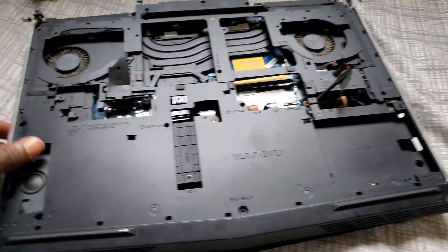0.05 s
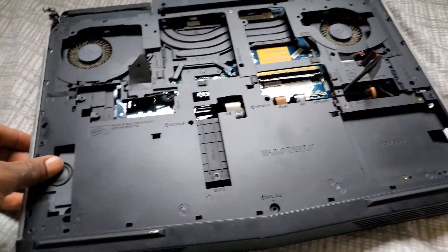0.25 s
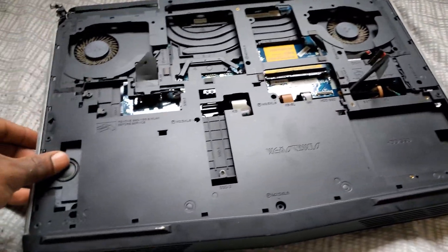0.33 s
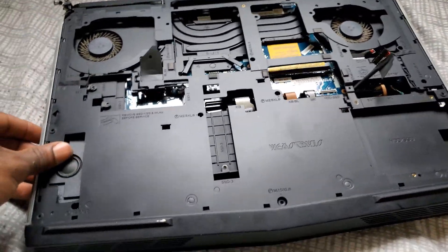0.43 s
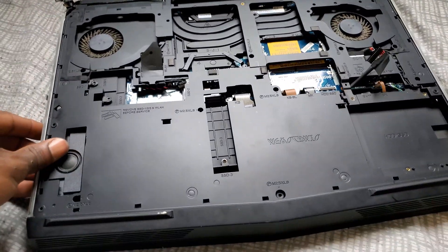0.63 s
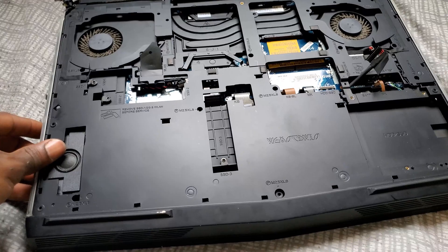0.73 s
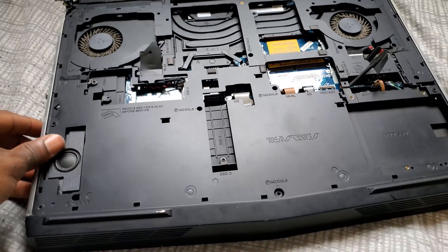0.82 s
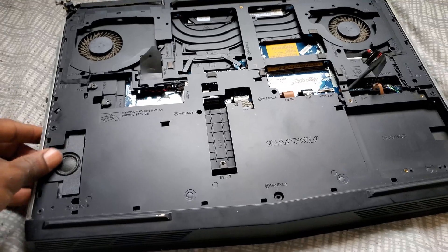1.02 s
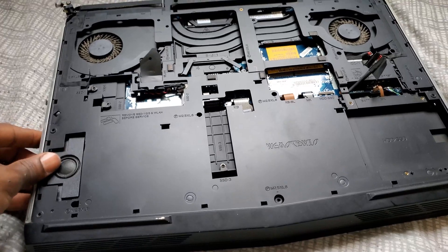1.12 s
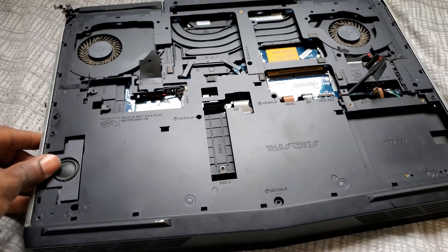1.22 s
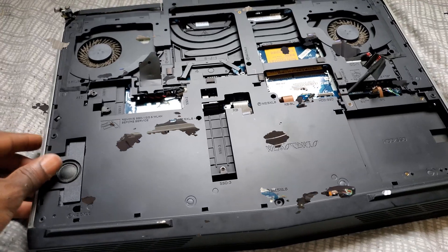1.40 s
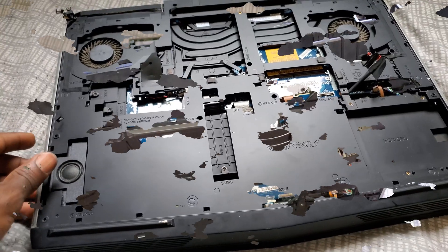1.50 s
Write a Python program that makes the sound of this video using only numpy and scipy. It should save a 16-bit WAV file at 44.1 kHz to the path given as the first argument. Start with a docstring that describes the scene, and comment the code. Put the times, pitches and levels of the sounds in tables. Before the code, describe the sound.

An opened laptop is set down on a bed: its plastic case clacks twice with soft thumps and cloth scuffs, loose parts rattle briefly, then two soft knocks follow. Heard close in a small, quiet room.

```python
"""Laptop set down on a bed

A small quiet room, a stereo microphone close by. An opened laptop is shifted by hand and let down on
the cloth cover. Its plastic case clacks twice, loose parts rattle as it settles, and two soft knocks
follow. The weight thumps into the padding, the case scuffs the cloth, and a low rumble lies under it."""
import sys
import numpy as np
from scipy import signal
from scipy.io import wavfile

SR = 44100
rng = np.random.default_rng(int(sys.argv[2]) if len(sys.argv) > 2 else 0)


def unload_wav(signal):
    """Save mono or channel-first audio to the path in sys.argv[1] as 16-bit WAV at rate SR, clipped to [-1, 1]."""
    wavfile.write(
        sys.argv[1],
        SR,
        np.round(np.clip(np.atleast_2d(signal).T, -1, 1) * 32767).astype(np.int16),
    )


N = 68355
TIME = np.arange(N) / SR
EDGES_HZ = np.minimum(20.3 * 2 ** (np.arange(21) / 2), 17000)  # half octaves
BANDS = [(lo, hi, np.sqrt(lo * hi)) for lo, hi in zip(EDGES_HZ, EDGES_HZ[1:])]


def from_db(db):
    """Decibels to gain."""
    return 10 ** (np.asarray(db) / 20)


def at_hz(points, hz, column=1):
    """Read a column of a table on a log-frequency axis."""
    table = np.array(points)
    return np.interp(np.log(hz), np.log(table[:, 0]), table[:, column])


def pan(db):
    """Left and right gains; positive dB leans left."""
    return from_db(np.array([[.5], [-.5]]) * db)


def stereo_noise(correlation):
    """White noise in two channels with a given correlation."""
    c = np.clip(correlation, -1, 1)
    mid, side = rng.standard_normal((2, N))
    return np.sqrt((1 + c) / 2) * mid + np.sqrt((1 - c) / 2) * side * [[1], [-1]]


def band(x, lo, hi):
    """Band-pass that keeps the level of white noise."""
    sos = signal.butter(2, [lo, hi], "band", fs=SR, output="sos")
    return signal.sosfilt(sos, x + 1e-18) * np.sqrt(SR / 2 / (hi - lo))


def fade(power, t60):
    """Each pulse of power dies away."""
    return signal.lfilter([1], [1, -from_db(-120 / (t60 * SR))], power + 1e-18)


def smooth(x, seconds):
    """One-pole lag."""
    r = np.exp(-1 / (seconds * SR))
    return signal.lfilter([1 - r], [1, -r], x)


# Room tone at the microphone: (frequency [Hz], band level [dB])
ROOM_TONE = [(25, -66), (40, -67), (60, -48.5), (90, -63), (130, -67), (200, -62), (300, -70), (550, -77),
             (1100, -75.5), (2200, -73), (6000, -69.5), (9000, -71.5), (14000, -69.5)]
# Its lean: (frequency [Hz], left-right [dB])
ROOM_TONE_PAN = [(100, 0.5), (1000, 1), (2500, -7.5), (6000, -0.5), (12000, -0.5)]
# Its width: (frequency [Hz], left-right correlation [0-1])
ROOM_TONE_CORRELATION = [(60, 0.74), (200, 0.87), (550, 0.036)]


def room_tone():
    """Low rumble and faint hiss all around the bed."""
    out = 0
    for lo, hi, hz in BANDS:
        noise = band(stereo_noise(at_hz(ROOM_TONE_CORRELATION, hz)), lo, hi)
        out += from_db(at_hz(ROOM_TONE, hz)) * pan(at_hz(ROOM_TONE_PAN, hz)) * noise
    return out


# The walls' answer: (frequency [Hz], level against the contact [dB], t60 [s], left-right [dB])
REVERB = [(176, -4.5, 0.22, -2), (426, -12, 0.12, 1), (810, -9, 0.13, -4), (1230, -3.5, 0.16, 1.5),
          (2660, -12.5, 0.2, -9), (5170, -6.5, 0.23, -6), (12000, -11, 0.21, 0)]


def room_tail(hits, hz):
    """Power of the diffuse tail in one band: it builds quickly in the small room, then dies."""
    db, t60, pan_db = (at_hz(REVERB, hz, column) for column in (1, 2, 3))
    return smooth(fade(hits ** 2, t60), seconds=0.0032) * (from_db(db) * pan(pan_db)) ** 2


# Resonances of the plastic case: (frequency [Hz], lift [dB], t60 [s], left-right [dB])
CASE_RESONANCES = [(217.7, 0.5, 0.26, 1), (368, 2, 0.052, -4), (638.7, 0, 0.075, 5.5),
                   (705.5, -7, 0.08, 4.5), (884.4, 3.5, 0.11, -0.5), (1152, 3, 0.031, 7),
                   (1236, 6, 0.073, 3.5), (1490, -9, 0.069, 9.5), (1677, -0.5, 0.067, 10),
                   (1877, -13, 0.045, 13.5), (2190, -0.5, .085, 2.5), (2285, -5.5, 0.058, 1.5),
                   (2425, -18, .08, -3), (2785, 0, 0.056, -4), (3350, -12, 0.078, -12),
                   (3523, -13.5, 0.055, -4), (3936, 0, 0.077, -3), (4440, -6.5, .2, 4.5)]


def case(shake):
    """The case's resonances ring on top of whatever shakes it."""
    out = shake
    for hz, lift_db, t60, pan_db in CASE_RESONANCES:
        r, w = from_db(-60 / (t60 * SR)), 2 * np.pi * hz / SR
        ring = signal.lfilter([1, 0, -1], [1, -2 * r * np.cos(w), r * r], shake) * (1 - r * r) / 2
        out = out + from_db(lift_db) * pan(pan_db) * ring
    return out


# Width of the case at the microphone: (frequency [Hz], left-right correlation [0-1])
CASE_CORRELATION = [(250, 1), (700, 0.87), (1250, 0)]


def case_noise(hz):
    """White noise as wide as the case sounds at hz: centred bass, spread treble."""
    return stereo_noise(at_hz(CASE_CORRELATION, hz))


# Slides on the cover: (peak time [s], level [dB], rise [s], fall [s], tilt about 3 kHz [dB/octave])
SLIDES = [(.003, -32.5, 0.014, 0.035, -2.5), (0.179, -46.5, 0.051, 0.035, -1),
          (0.46, -37, 0.018, 0.034, -2.5), (1.098, -54.5, 0.027, 0.053, 2),
          (1.453, -57, 0.006, 0.021, -1.5), (1.54, -61, 0.055, .06, 5)]
# Colour of the cloth friction: (frequency [Hz], band gain [dB])
CLOTH_COLOUR = [(200, -24.5), (500, -37), (1000, -24), (2000, -9), (3500, -12.5), (6500, -6.5),
                (9000, -16.5), (14000, -9)]


def scuffs():
    """Soft hiss of the case on cloth swells with each slide and rings in the case, a little to the right."""
    out = 0
    for lo, hi, hz in BANDS[6:]:
        slides = 0
        for peak, db, rise, fall, tilt_db in SLIDES:
            swell = np.exp(-np.maximum((peak - TIME) / rise, (TIME - peak) / fall))
            slides += from_db(db + tilt_db * np.log2(hz / 3000)) * swell
        out += from_db(at_hz(CLOTH_COLOUR, hz)) * band(slides * case_noise(hz), lo, hi)
    return case(out) * pan(-2.5)


# The weight sinks into the bed, dead centre: (time [s], frequency [Hz], level [dB], rise [s])
PADDING_SWINGS = [(-.012, 63, -30, 0.019), (0.224, 61.7, -31.5, 0.03), (0.239, 90.6, -33.5, 0.031),
                  (0.264, 191.8, -35, 0.012), (0.564, 61.6, -38, 0.031), (0.641, 46, -34.5, 0.018),
                  (0.614, 138.7, -33.5, 0.014), (1.105, 59.2, -42, 0.038), (1.123, 126.4, -41, 0.007),
                  (1.218, 81.2, -39, 0.0085), (1.225, 151, -37, 0.0061)]


def thumps():
    """The laptop bobs on the padding: low swings that swell and die."""
    out = 0
    for start, hz, db, rise in PADDING_SWINGS:
        age = np.maximum(TIME - start, 0)
        swell = age / rise * np.exp(1 - age / rise)
        out += from_db(db) * swell * np.sin(2 * np.pi * hz * age)
    return out


# Loose parts in the laptop: (start [s], end [s], level [dB])
RATTLE_SPANS = [(0.541, 0.653, -42)]
# Their colour: (low [dB], middle [dB], high [dB], top [dB])
RATTLE_ZONES_DB = [-3.5, 3.5, -17, -6.5]


def rattle(per_s=360, spread_db=7, fade_db_per_s=40, ring_hz=2396, ring_db=-11.5):
    """Loose parts touch in quick succession, unevenly and ever more weakly; rows as in CASE_KNOCKS."""
    rows = []
    for start, end, db in RATTLE_SPANS:
        for k, (late, force, side) in enumerate(rng.standard_normal(size=(60, 3))):
            age = abs(k + 0.033 * late) / per_s
            zones_db = db + spread_db * force - fade_db_per_s * age + np.array(RATTLE_ZONES_DB)
            if start + age < end:
                rows.append((start + age, *zones_db, 2 * side, ring_hz, ring_db, 0))
    return rows


# Centres of a contact's four zones: (low [Hz], middle [Hz], high [Hz], top [Hz])
ZONE_CENTRES_HZ = [380, 1600, 5000, 11000]


def strength(rows, hz):
    """How hard each contact shakes the case at one frequency."""
    return from_db([np.interp(np.log(hz), np.log(ZONE_CENTRES_HZ), row[1:5]) for row in rows])


def rings(rows, width_octaves=0.055, t60_share=0.55):
    """Where a contact falls decides which resonances ring out; the touching parts shorten them."""
    when, favoured_hz, ring_db = (rows[:, 0] * SR).astype(int), rows[:, 6], rows[:, 7]
    out = 0
    for hz, _, t60, pan_db in CASE_RESONANCES:
        nearness = np.exp(-(np.log2(hz / favoured_hz) / width_octaves) ** 2)
        hits = np.zeros(N)
        hits[when] = strength(rows, hz) * nearness * from_db(ring_db)
        r, w = from_db(-60 / (t60 * t60_share * SR)), 2 * np.pi * hz / SR
        out += pan(pan_db) * signal.lfilter([0, np.sin(w)], [1, -2 * r * np.cos(w), r * r], hits + 1e-18)
    return out


def microphone_lag(x, lag_s=0.000089):
    """The sound reaches the right microphone a moment after the left."""
    return np.array([x[0], np.interp(TIME - lag_s, TIME, x[1])])


# Colour common to all clacks: (frequency [Hz], band gain [dB])
PLASTIC_COLOUR = [(140, -10.5), (200, -9.5), (280, -9.5), (390, -5.5), (540, -22.5), (780, -1.5),
                  (1100, -9), (1550, -5.5), (2200, 0), (3100, 1), (4400, -4.5), (6200, 0.5), (8800, -7),
                  (13500, 1.5)]


def clacks(rows, gain_db=-5, click_db=-6):
    """Each contact is a click, a few milliseconds of chatter and a diffuse tail in the room."""
    when, pan_db, room_db = (rows[:, 0] * SR).astype(int), rows[:, 5], rows[:, 8]
    out = 0
    for lo, hi, hz in BANDS[5:]:
        hits, to_room = np.zeros((2, N)), np.zeros(N)
        hits[:, when] = strength(rows, hz) * pan(pan_db)
        to_room[when] = strength(rows, hz) * from_db(room_db)
        chatter_t60 = 0.023 * (2000 / hz) ** 0.047  # seconds, slightly longer in the bass
        chatter_power = smooth(fade(hits ** 2, chatter_t60), seconds=0.00041)
        decay = np.sqrt(chatter_power + room_tail(to_room, hz)) * case_noise(hz)
        click = hits * from_db(click_db) * np.sqrt(chatter_t60 * SR / np.log(1e6))
        out += from_db(gain_db + at_hz(PLASTIC_COLOUR, hz)) * band(click + decay, lo, hi)
    return case(out)


# Contacts in the case, close up: (time [s], low [dB], middle [dB], high [dB], top [dB],
# left-right [dB], favoured resonance [Hz], its ring [dB], room send [dB])
CASE_KNOCKS = [(0.1903, -64, -31, -34, -24, -2, 3980, -14, -1),
               (.197, -32, -27.5, -26.5, -59, -1, 664, 10, 5.5),
               (.209, -50, -29.5, -27.5, -40, -7, 2820, -7, 4),
               (.2165, -34, -17.5, -22, -16, 5.5, 3970, 4.5, 1.5),
               (0.2189, -24.5, -17.5, -15, -48, 2, 1910, 3.5, 2.5),
               (0.2255, -26, -13.5, -34, -48, -3, 2150, 7.5, 2.5),
               (.2355, -24, -16.5, -16.5, -44, 4, 3500, 9.5, 0.5),
               (.244, -30, -33.5, -20, -55, 5, 883, 2, 2.5), (0.2785, -37.5, -20, -26, -65, 9, 864, 5.5, 0),
               (.458, -57, -48, -58, -65, 10, 706, 12, 10), (.461, -52, -44, -46.5, -64, 11, 3970, 13, 10),
               (0.504, -37, -21, -21.5, -32.5, 6.5, 2350, -3.5, -2.5),
               (.505, -44, -20, -22, -39, 4, 2789, -11, -1.5), (.506, -42, -25.5, -25, -41, 8, 3300, 4, 2),
               (0.512, -32, -27.5, -48, -42, -2, 1190, 1, 5.5),
               (.533, -35, -16, -14.5, -29, 4, 2334, 4.5, -8),
               (.5342, -25, -18.5, -17.5, -46, -2.5, 697, 4.5, -1.5),
               (.555, -41, -20, -30, -48, -2, 2410, 2.5, 2),
               (0.5821, -33, -28.5, -23, -40.5, 7, 880, -11, -0.5),
               (0.606, -27.5, -18.5, -59, -54, 0.5, 2400, 6.5, -6.5),
               (.616, -33.5, -19, -39, -60, 3, 1207, -7, 3),
               (0.638, -25.5, -23, -27, -47, -2, 873, -12, -1.5),
               (0.652, -22.5, -30, -58, -46.5, 3, 790, -5, -21),
               (0.662, -56.5, -50, -30, -47, 3, 883, 11, -8),
               (0.834, -61.5, -54.5, -54, -52.5, -3, 2920, -4.5, 0),
               (0.972, -93.5, -58, -63.5, -53, -5.5, 2785, 7.5, 3),
               (1.122, -36.5, -30.5, -70, -50, 6, 1219, -2, -5.5),
               (1.134, -43, -44, -68, -72, -6, 638, 1, 5.5),
               (1.202, -59, -45.5, -57, -68, 0.5, 2170, 12.5, 9.5),
               (1.224, -43, -44.5, -55, -66, 2, 219, 3.5, 8.5),
               (1.237, -44, -43, -53, -53.5, 8, 1150, 1, 0.5),
               (1.262, -61.5, -60, -65.5, -72, 6, 4470, 11.5, -3)]


def laptop():
    """Knocks and loose parts strike the plastic case, which clacks and rings."""
    rows = np.array(CASE_KNOCKS + rattle())
    return clacks(rows) + microphone_lag(rings(rows))


def scene():
    """The handled laptop in its room, heard from beside the bed."""
    return laptop() + thumps() + scuffs() + room_tone()


def record(dry):
    """The top is cut steeply above 15.6 kHz."""
    return signal.sosfilt(signal.ellip(10, .2, 80, 15600, fs=SR, output="sos"), dry)


dry = scene()
out = record(dry)
unload_wav(out)
```